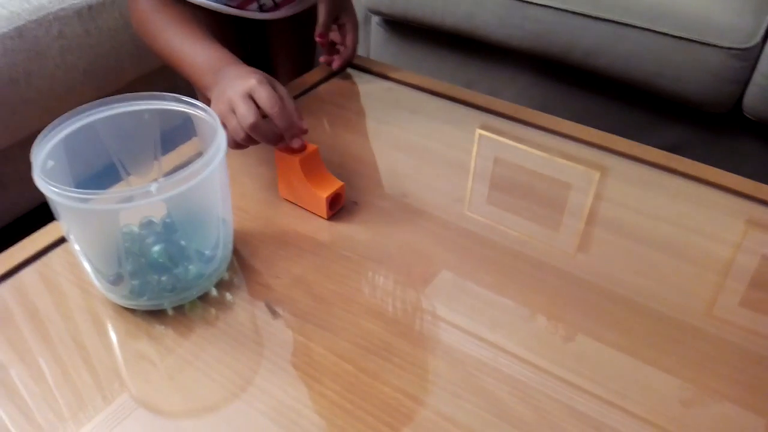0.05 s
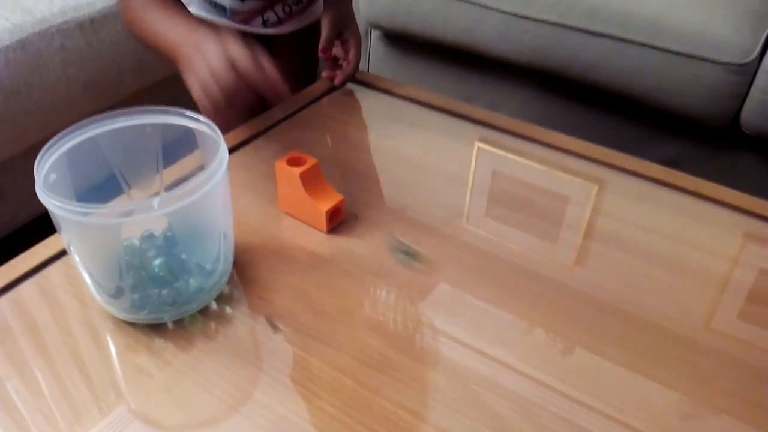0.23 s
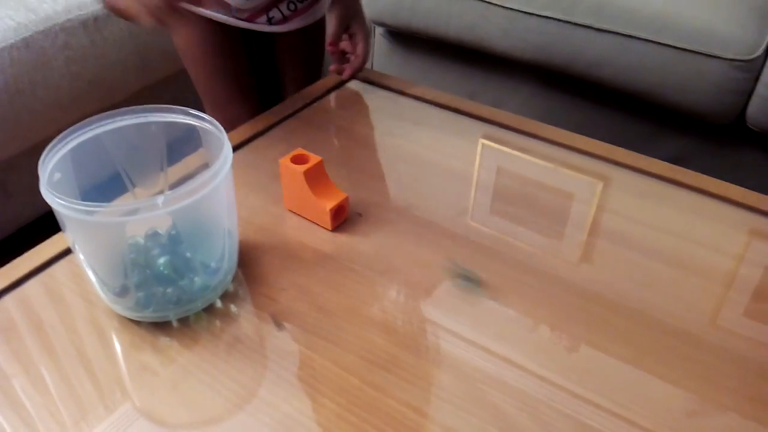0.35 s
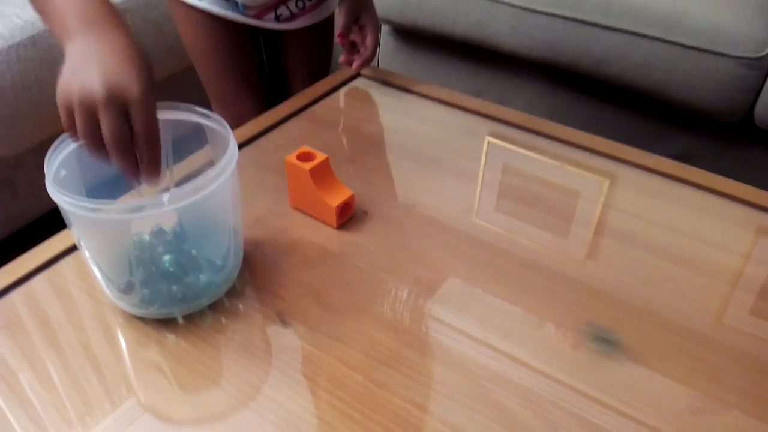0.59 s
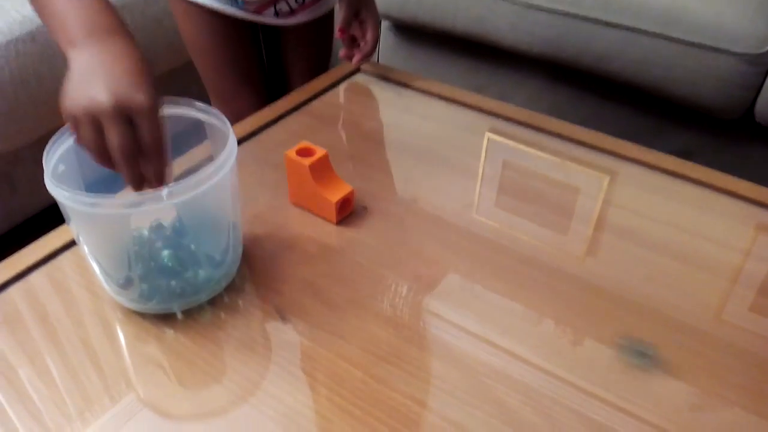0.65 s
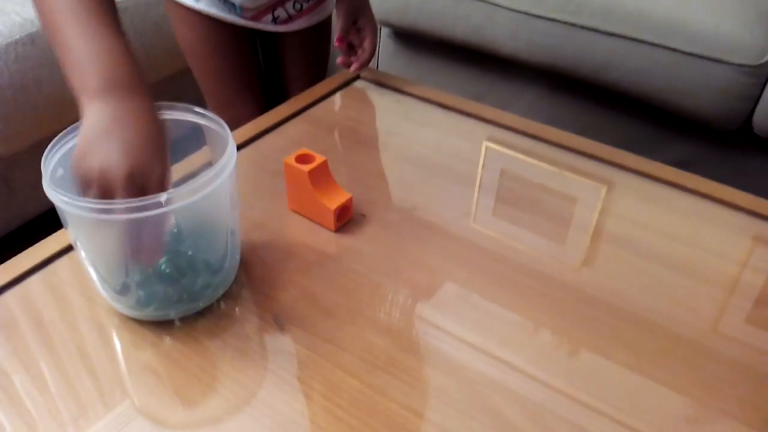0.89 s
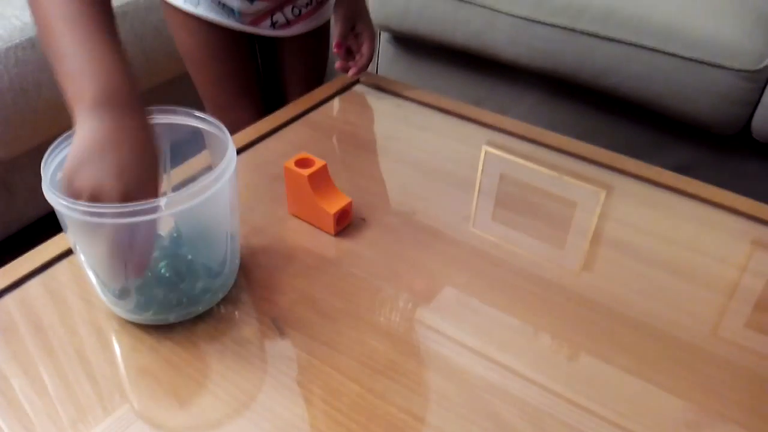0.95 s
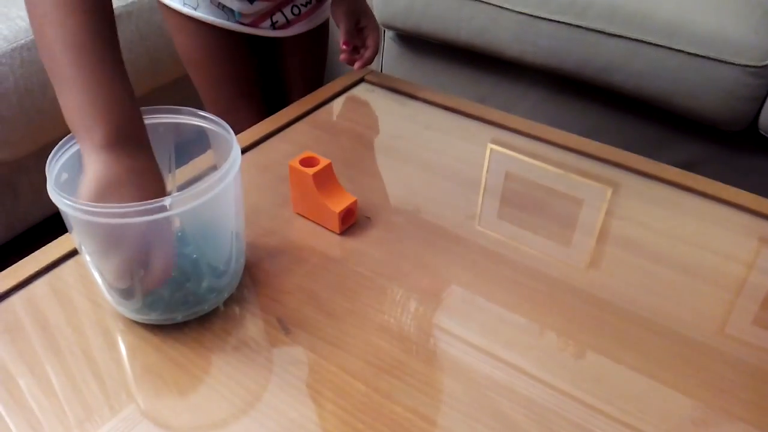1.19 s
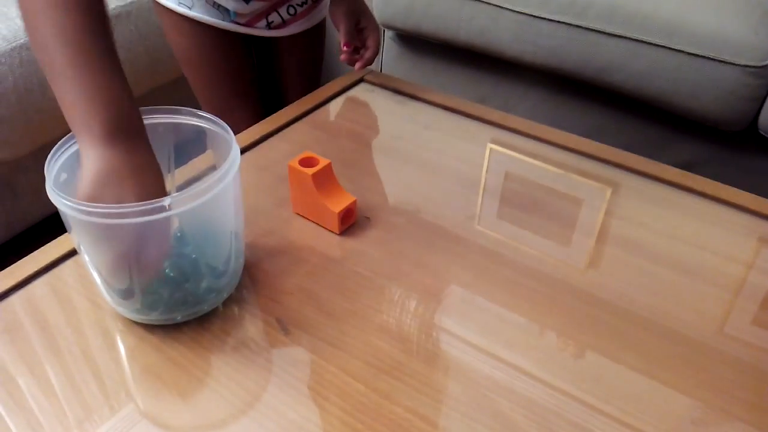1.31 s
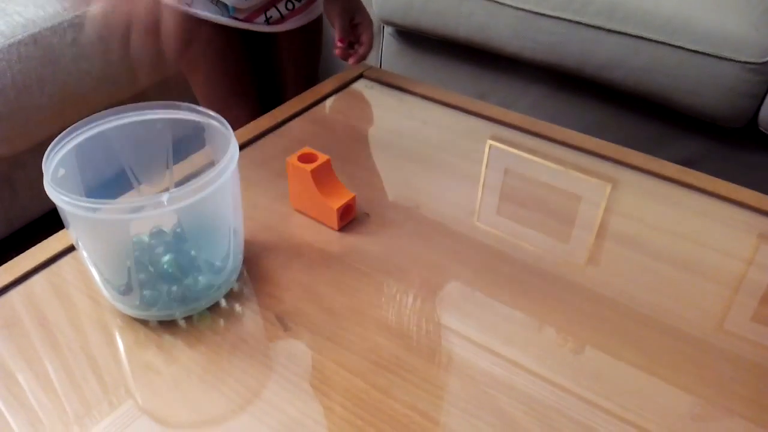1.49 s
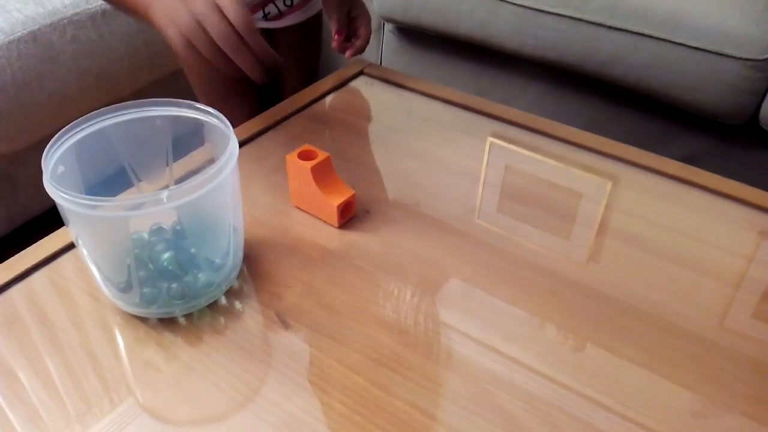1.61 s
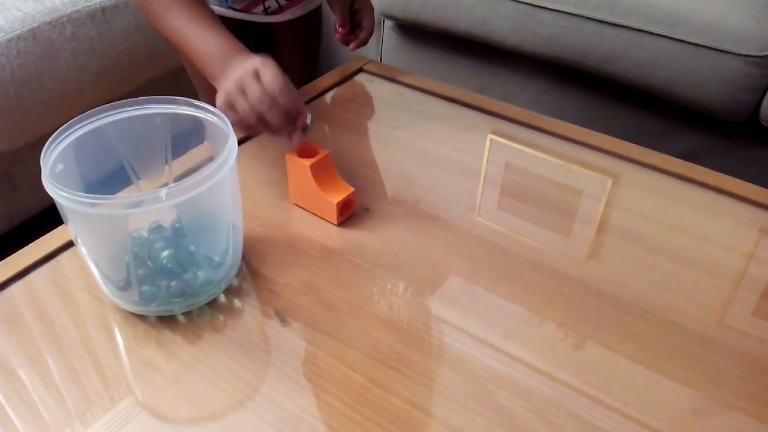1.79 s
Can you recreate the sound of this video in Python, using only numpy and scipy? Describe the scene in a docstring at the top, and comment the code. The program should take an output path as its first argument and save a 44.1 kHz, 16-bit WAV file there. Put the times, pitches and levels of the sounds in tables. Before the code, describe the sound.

A glass marble drops onto a hard tabletop, bounces and rolls away.

```python
"""A glass marble drops onto a hard tabletop, bounces twice and rolls away in a chatter of tiny skips.
Each contact is an impulse that excites the resonances of marble and top and keeps them ringing.
Before the drop, the marble knocks down the bore of a small plastic slide. A hand picks among the
marbles in a plastic tub and bumps the slide again; a small living room reverberates."""
import sys
import numpy as np
from scipy import signal
from scipy.fft import rfft, irfft
from scipy.io import wavfile
from scipy.ndimage import uniform_filter1d

SR = 44100
rng = np.random.default_rng(int(sys.argv[2]) if len(sys.argv) > 2 else 0)


def wav_out(sig):
    """Save sig, one row per channel (or a flat mono array), as 16-bit PCM at SR to the path in sys.argv[1]."""
    wavfile.write(sys.argv[1], SR, np.round(np.clip(np.atleast_2d(sig).T, -1, 1) * 32767).astype(np.int16))


N = 81585


# The drop and its bounces. Each row: start in seconds, level in dB.
LANDING_BLOWS = [(.2788, 16), (.2944, 9.5), (.3034, 1.5)]
# Spectrum of a hard blow. Each row: frequency in Hz, relative level in dB.
IMPACT_SPECTRUM = [(40, -45), (180, -19), (450, -20.5), (1400, -17.5), (3400, -6.5), (4800, 2.5), (6400, 0),
                   (7400, -2), (8400, -9.5), (10500, -18.5), (15500, -29)]

def landing():
    """Impact excitation: the marble strikes the top and bounces, setting the modes of both ringing."""
    blows = convolve(impulses(LANDING_BLOWS), ring(t60=0.022, crack_db=-18))
    return room(convolve(blows, colour(IMPACT_SPECTRUM, table_modes(0))), wet_db=-7.5)


# Rolling contact. Each row: time in seconds, force level in dB, treble gain in dB.
ROLL_CURVE = [(.29, -58, -5), (.38, -38, 6), (.47, -34.5, -6.5), (.54, -39, 1.5), (.7, -35.5, -1),
              (.88, -35, -1), (1.08, -37.5, -2), (1.3, -35, -1.5), (1.41, -35, -3), (1.47, -32, -2),
              (1.54, -46.5, 4), (1.6, -33.5, -1), (1.7, -40.5, -0.5), (1.76, -35, 1), (1.85, -58, 4)]
# The top's hollow note, sinking near the edge. Each row: time in seconds, frequency in Hz, gain in dB.
HOLLOW_NOTE = [(.4, 970, -9), (.7, 993, 15.5), (1.03, 1028, 6.5), (1.3, 848, 3.5), (1.47, 843, 5),
               (1.56, 890, -1)]

def rolling(spots=12, contacts_per_s=1500, slowing_s=1.2, spread_db=7.5):
    """Rolling noise: random contacts, thinning as the marble slows, drive the top spot after spot."""
    t = np.arange(N) / SR
    level_db, treble_db = curves(ROLL_CURVE)
    hollow_hz, hollow_db = curves(HOLLOW_NOTE)
    rate = contacts_per_s * np.exp(-t / slowing_s)
    contacts = rng.random(N) < rate / SR
    strength = amp(spread_db * np.minimum(rng.standard_normal(N), 1))
    grit = unit_rms(contacts * strength / np.sqrt(rate))  # even power as the contacts thin out
    landed = t > LANDING_BLOWS[0][0]
    force = grit * amp(level_db) * landed + amp(-1.5) * skips()
    place = np.round(t / t[-1] * (spots - 1))
    top = sum(table_spot(force * (place == k), k / (spots - 1)) for k in range(spots))
    body = lowpass(top, 4000)
    top = body + amp(treble_db) * (top - body)
    hollow = resonate(top * amp(hollow_db), hollow_hz, width_hz=55)
    return room(top + hollow, wet_db=-5.0)


# The rolling marble's larger skips. Each row: start in seconds, relative level in dB.
SKIPS = [(.409, -4), (.4935, -1.5), (.500, 2), (.5045, -1), (.522, -6), (.533, -3.5), (.5828, -3.5),
         (.6152, -1), (.6185, -3.5), (.645, -1.5), (.719, -3.5), (.726, -3.5), (.743, -3), (.782, -6.5),
         (.8377, -15), (.847, -3), (.872, -3.5), (.887, -7.5), (.969, -6), (.982, -3.5), (1.0168, -1),
         (1.1016, -5.5), (1.15, -5.5), (1.181, -7), (1.19, -1.5), (1.2005, -4), (1.2428, -2.5), (1.291, -4),
         (1.3211, -3), (1.368, -5.5), (1.443, -7), (1.4743, -2.5), (1.512, -5.5), (1.515, -9.5),
         (1.525, -29), (1.583, -4), (1.591, -6), (1.622, -6), (1.645, -11), (1.677, -13), (1.731, -8.5),
         (1.737, -6), (1.783, -5.5)]

def skips(rebound_s=0.004, rebound_db=-3):
    """Inelastic rebound: a softer impulse follows each skip a few milliseconds later."""
    gaps = rebound_s * rng.uniform(.5, 2, len(SKIPS))
    rebounds = [(s + gap, db + rebound_db) for (s, db), gap in zip(SKIPS, gaps)]
    return impulses(SKIPS) + impulses(rebounds)


# Spectrum of the tabletop. Each row: frequency in Hz, relative level in dB.
TABLE_SPECTRUM = [(40, -30), (200, -29), (480, -19), (720, -8.5), (1900, -8.5), (2500, -6), (3800, -5.5),
                  (5000, 0), (6400, 0), (7400, -11.5), (8500, -18.5), (10500, -32), (15000, -49.5)]

def table_spot(force, way):
    """Impulse response: the top answers a force at one spot, from way 0 (slide) to 1 (far end)."""
    waves = convolve(force, disperse(ring(t60=0.022, crack_db=-9), way))
    return convolve(waves, colour(TABLE_SPECTRUM, table_modes(way, scatter=0.33)))


# Resonances of marble and top. Each row: frequency in Hz, bandwidth in Hz,
# lift near the slide in dB, lift at the far end in dB.
TABLE_MODES = [(2305, 170, 6, 7), (3450, 460, 2, 10.5), (4520, 690, 0.5, 5.5), (5155, 160, 5.5, 6),
               (6157, 60, 15.5, 5), (6306, 278, 11.5, 8.5), (7190, 187, 11, 7.5)]

def table_modes(way, scatter=0):
    """Modal response depends on the point struck; scatter varies tuning and strength at random."""
    hz, width, near_db, far_db = np.transpose(TABLE_MODES)
    detune, lift = scatter * rng.uniform(-1, 1, (2, len(TABLE_MODES)))
    lift_db = near_db + way ** 3 * (far_db - near_db) + 2 * lift
    return np.transpose([hz * (1 + 0.004 * detune), width, lift_db])


def disperse(x, way, chirp_s=0.0026, fastest_hz=9000):
    """Dispersion: treble crosses the top faster than bass, so a distant click is a falling chirp."""
    size = 2 * x.shape[1]
    hz = np.fft.rfftfreq(size, 1 / SR)
    delay = way * chirp_s * (np.sqrt(fastest_hz / np.clip(hz, 500, fastest_hz)) - 1)
    phase = -2 * np.pi * np.cumsum(delay) * SR / size
    return irfft(rfft(x, size) * np.exp(1j * phase))[:, :size // 2]


# Knocks on the slide. Each row: start in seconds, level in dB.
SLIDE_KNOCKS = [(0.0356, -17.5), (.163, -14.5), (.183, -7.5), (.191, -9), (.208, -6), (0.2226, -4),
                (0.229, -5.5), (.2325, 3), (.278, -10), (1.836, -21)]
# Spectrum of the plastic. Each row: frequency in Hz, relative level in dB.
SLIDE_SPECTRUM = [(40, -22.5), (200, -9.5), (450, -10), (850, 1.5), (2600, 1.5), (3600, -12.5),
                  (6500, -15.5), (9000, -39), (15000, -87)]
# Resonances of the bore. Each row: frequency in Hz, bandwidth in Hz, lift in dB.
BORE_MODES = [(940, 43, 0.5), (1414, 40, 8)]

def slide():
    """Cavity resonance: the bore gives each short knock on the plastic a hollow sound."""
    knocks = sum(convolve(impulses([row]), ring(t60=0.038, crack_db=-9)) for row in SLIDE_KNOCKS)
    return room(convolve(knocks, colour(SLIDE_SPECTRUM, BORE_MODES)), wet_db=-12.5)


# Marbles clicking in hand and tub. Each row: start in seconds, level in dB.
GLASS_TICKS = [(.055, -34), (.1695, -13), (.183, -10.5), (.208, -16), (.233, -5), (.237, -8), (1.19, -6.5),
               (1.837, -8)]
# Spectrum of a click. Each row: frequency in Hz, relative level in dB.
GLASS_SPECTRUM = [(200, -64), (2000, -12), (3800, 0), (5200, 7.5), (6000, 10), (7300, -0.5), (8500, -18),
                  (15500, -36)]
# Resonance of clicking glass. Each row: frequency in Hz, bandwidth in Hz, lift in dB.
GLASS_MODES = [(5550, 220, 3.3)]

def glass_ticks():
    """Hard contact: glass meets glass or hard plastic so briefly that the click is bright."""
    ticks = convolve(impulses(GLASS_TICKS), ring(t60=0.016, crack_db=-4))
    return room(convolve(ticks, colour(GLASS_SPECTRUM, GLASS_MODES)), wet_db=-2)


# The hand on tub and slide. Each row: start in seconds, relative level in dB, frequency in Hz.
HAND_BUMPS = [(1.359, -32, 297), (1.834, -20.5, 420)]

def hand_bumps():
    """Soft contact: a hand on plastic excites a low, damped resonance, heard as a thud."""
    thuds = 0
    for s, db, hz in HAND_BUMPS:
        blow = convolve(impulses([(s, db)]), ring(t60=0.098, crack_db=-17))
        thuds += resonate(blow, np.full(N, hz), width_hz=180)
    return room(amp(15) * lowpass(thuds, 800), wet_db=5.5)


# Reverberation of the room. Each row: frequency in Hz, time to fall 60 dB in seconds.
ROOM_T60 = [(150, 0.4), (800, 1.03), (3000, 0.55), (6500, 0.18), (14000, 0.23)]

def room(x, wet_db, onset_s=0.0042, size=16384):
    """Reverberation: the direct sound is joined by a diffuse tail whose treble dies first."""
    hz, t, noise = signal.stft(noise_pair(size), SR, nperseg=256)
    decay = amp(-60 * t / at_frequency(ROOM_T60, hz)[:, None])
    tail = signal.istft(noise * decay * np.minimum(t / onset_s, 1), SR, nperseg=256)[1]
    return x + amp(wet_db) * convolve(x, tail / np.linalg.norm(tail[0]))


# Spectrum of the room's background. Each row: frequency in Hz, relative level in dB.
AIR_SPECTRUM = [(25, -13), (70, -11), (135, 9.5), (250, -14), (900, 7.5), (2500, -9), (6000, -8),
                (9000, -33), (15000, -39)]

def air(level_db=-64):
    """Ambient noise: a quiet, steady, coloured background fills the room."""
    return amp(level_db) * unit_rms(convolve(noise_pair(N), colour(AIR_SPECTRUM)))


def ring(t60, crack_db, rise_s=0.00042, size=4096):
    """Diffuse vibration: a crack, then waves that build up and die away with no favoured pitch."""
    t = np.arange(size) / SR
    envelope = amp(-60 * t / t60) * (1 - np.exp(-t / rise_s))
    waves = noise_pair(size) * envelope / np.linalg.norm(envelope)
    waves[:, 0] += amp(crack_db)
    spectrum = rfft(waves, 2 * size)
    smooth_power = uniform_filter1d(abs(spectrum) ** 2, size=101, axis=1)
    return irfft(spectrum / np.sqrt(smooth_power))[:, :size]


# Stereo balance. Each row: frequency in Hz, left minus right level in dB.
BALANCE = [(200, 2), (950, -3), (1900, -6.5), (3400, 0), (5500, -3.5), (6400, -6), (7500, -13),
           (15000, -11)]

def colour(spectrum, modes=(), size=8192):
    """Minimum-phase filter of unit energy: a broad spectrum, resonance peaks and stereo balance."""
    hz = np.fft.rfftfreq(size, 1 / SR)
    peaks = 1 + sum((amp(db) ** 2 - 1) / (1 + (2 * (hz - f) / width) ** 2) for f, width, db in modes)
    balance_db = np.outer([.5, -.5], at_frequency(BALANCE, hz))
    gain = amp(at_frequency(spectrum, hz) + balance_db) * np.sqrt(np.maximum(peaks, .1))
    log_gain = np.log(np.hstack([gain, gain[:, -2:0:-1]]))
    response = np.exp(signal.hilbert(log_gain).conj())
    taps = np.fft.ifft(response).real[:, :size // 2]
    return taps / np.sqrt(np.sum(taps ** 2) / 2)


def resonate(x, hz, width_hz):
    """Forced resonance: a damped oscillator of gain 1 whose tuning follows the curve hz."""
    turn = np.exp(2j * np.pi * np.cumsum(hz) / SR)
    pole = np.exp(-np.pi * width_hz / SR)
    return 2 * (turn * signal.lfilter([1 - pole], [1, -pole], x / turn)).real


def noise_pair(count, mono_hz=805):
    """Partial coherence: two channels of white noise, alike in the bass."""
    left, other = rfft(rng.standard_normal((2, count)))
    coherence = 1 / (1 + (np.fft.rfftfreq(count, 1 / SR) / mono_hz) ** 4)
    right = coherence * left + np.sqrt(1 - coherence ** 2) * other
    return irfft(np.array([left, right]), count)


def impulses(rows):
    """Ideal impacts: one impulse for each row of start in seconds and level in dB."""
    out = np.zeros(N)
    for s, db in rows:
        out[min(round(s * SR), N - 1)] += amp(db)
    return out


def convolve(x, response):
    """Linear filtering by a two-channel impulse response."""
    return signal.fftconvolve(np.atleast_2d(x), response, axes=1)[:, :N]


def lowpass(x, hz):
    """Second-order roll-off above hz."""
    return signal.sosfilt(signal.butter(2, hz, fs=SR, output="sos"), x)


def curves(points):
    """Linear interpolation of each column over time."""
    s, *columns = np.transpose(points)
    return [np.interp(np.arange(N) / SR, s, column) for column in columns]


def at_frequency(points, hz):
    """Interpolation on a log-frequency axis."""
    f, value = np.transpose(points)
    return np.interp(np.log(hz + 1), np.log(f + 1), value)


def amp(db):
    """Amplitude ratio from decibels."""
    return 10 ** (np.asarray(db) / 20)


def unit_rms(x):
    """Normalisation to rms 1."""
    return x / np.sqrt(np.mean(x ** 2) + 1e-20)


def scene():
    """Superposition: slide, table and tub sound in one room."""
    return slide() + glass_ticks() + landing() + rolling() + hand_bumps() + air()


def record(dry, edge_hz=15700):
    """Clipping and band limiting: the landing just overloads, then the highest treble is cut."""
    band_limit = signal.firwin(511, edge_hz, window=("kaiser", 9), fs=SR)
    return signal.oaconvolve(np.clip(dry, -1, 1), band_limit[None], "same")


dry = scene()
out = record(dry)
wav_out(out)
```